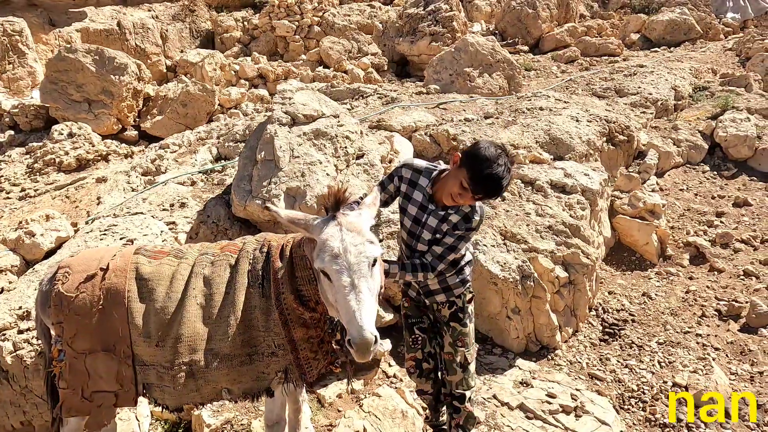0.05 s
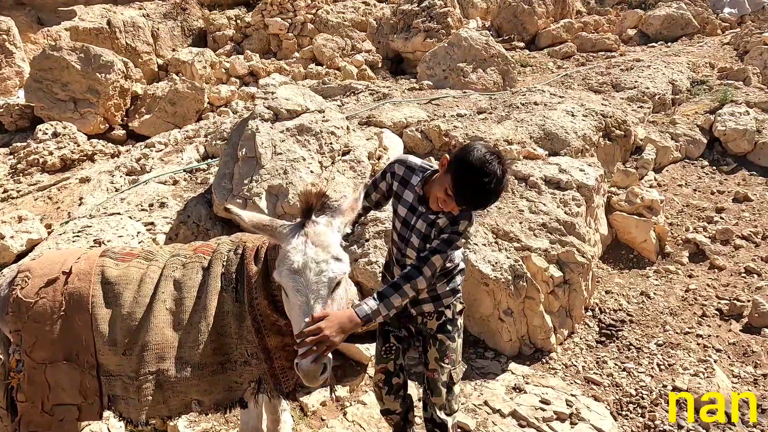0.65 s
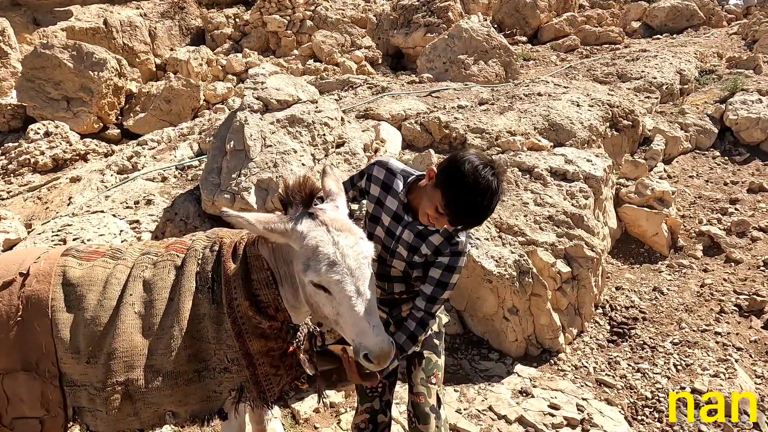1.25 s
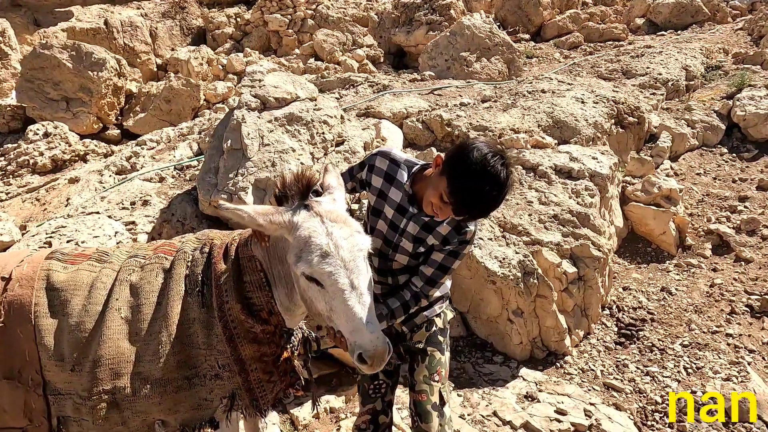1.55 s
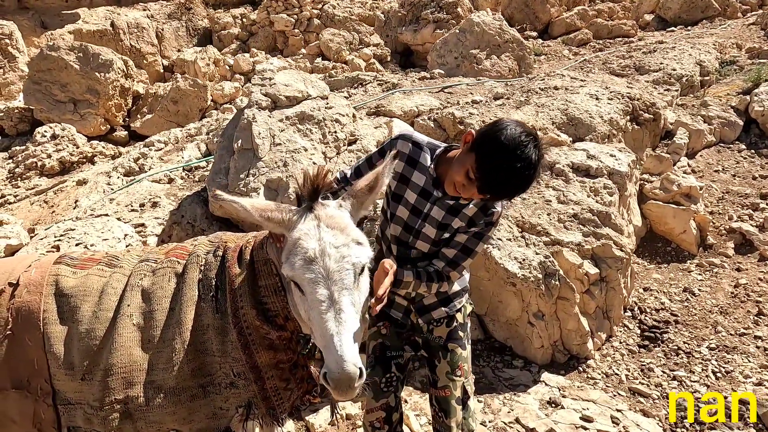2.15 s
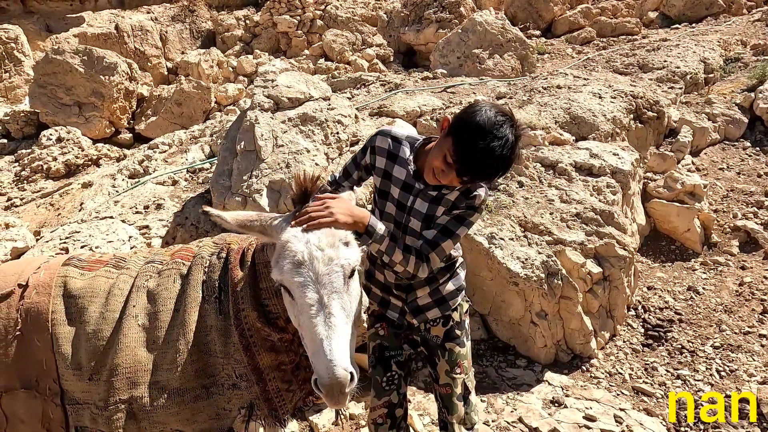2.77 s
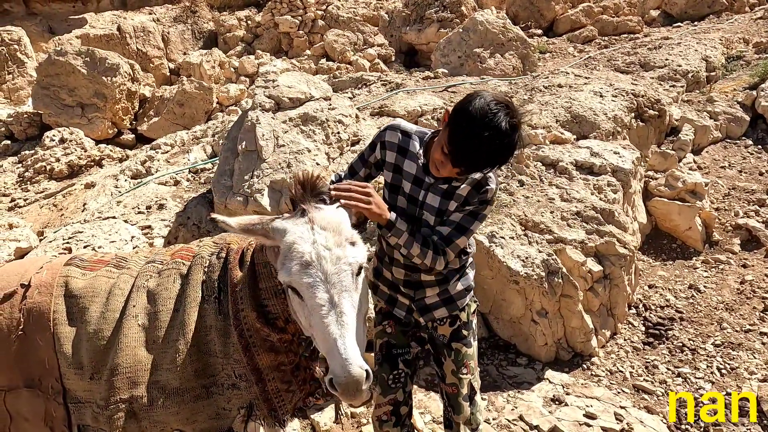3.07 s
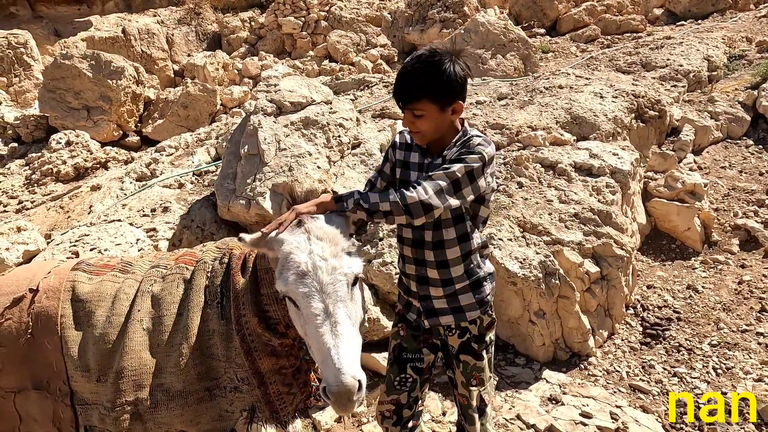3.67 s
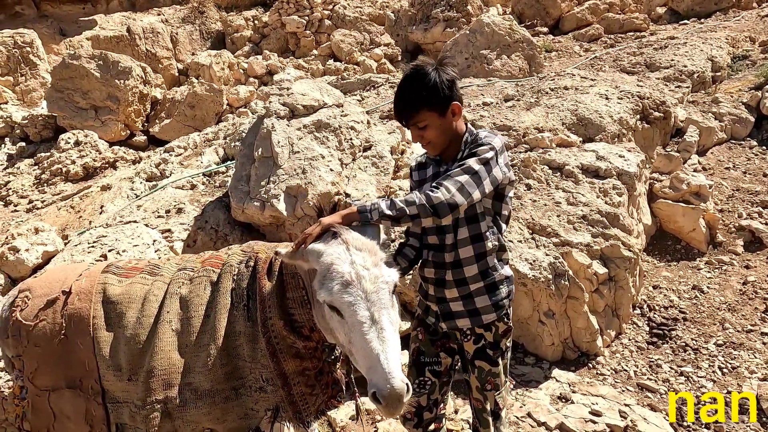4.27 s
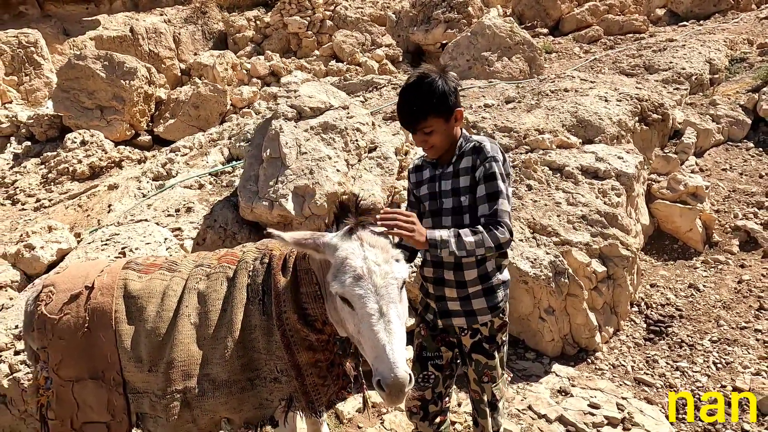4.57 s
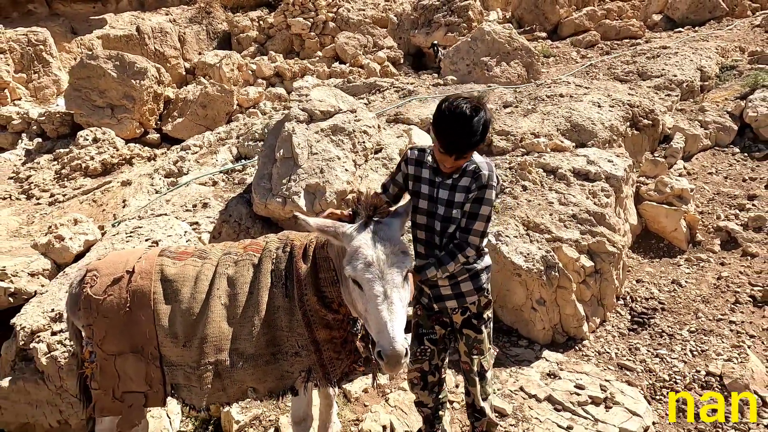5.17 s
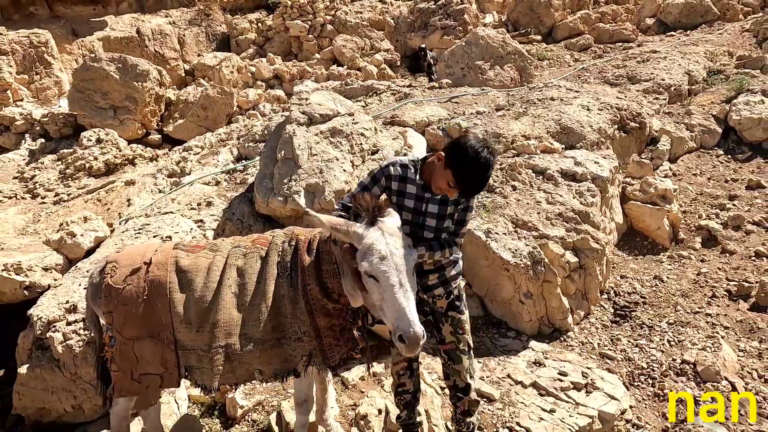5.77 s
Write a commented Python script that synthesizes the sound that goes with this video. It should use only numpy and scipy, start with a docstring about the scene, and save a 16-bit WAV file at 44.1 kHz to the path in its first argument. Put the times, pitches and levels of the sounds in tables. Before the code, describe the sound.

Several wavering goat bleats and a kid's bright cry sound over gusty low wind rumble and soft nearby scuffs and rustles.

```python
"""Goats and a donkey on a rocky slope

Goats bleat across dry ground, most voices throbbing about eleven times a second: long calls
from further off, then a low hoarse one and a kid's bright cry. Close to the microphone a donkey
is being stroked: hands brush its coat, feet scuff loose soil and stones knock, one sharply.
Gusts rumble and slap on the microphone ports over a faint outdoor hiss."""
import sys
import numpy as np
from scipy import signal
from scipy.fft import rfft, irfft, next_fast_len
from scipy.io import wavfile
from scipy.ndimage import uniform_filter1d

SR = 44100
rng = np.random.default_rng(int(sys.argv[2]) if len(sys.argv) > 2 else 0)


def waveform_to_disk(signal):
    """Save audio, clipped to [-1, 1], as 16-bit WAV at the path in sys.argv[1]."""
    frames = np.transpose(np.atleast_2d(signal))
    scaled = np.clip(frames, -1, 1) * 32767
    samples = np.round(scaled).astype(np.int16)
    wavfile.write(sys.argv[1], SR, samples)


N = 265526
T = np.arange(N) / SR
TOP_HZ = 15650  # the recorder's upper limit


def undb(db):
    """Decibels to gain."""
    return 10 ** (np.asarray(db) / 20)


def unit(x):
    """Scale to rms 1."""
    return x / np.sqrt(np.mean(x ** 2) + 1e-20)


def gain_at(hz, spectrum):
    """Gain of a spectrum (f/Hz, level/dB) at these frequencies."""
    f, db = np.transpose(spectrum)
    return undb(np.interp(np.log(hz + 1e-3), np.log(f), db))


def colour(x, spectrum):
    """Filter by a spectrum, causally, so that attacks stay sharp."""
    n = next_fast_len(2 * len(x)) * 2
    cepstrum = irfft(np.log(gain_at(np.arange(n // 2 + 1) * SR / n, spectrum)))
    cepstrum[1:n // 2] *= 2
    cepstrum[n // 2 + 1:] = 0
    return irfft(rfft(x, n) * np.exp(rfft(cepstrum)))[:len(x)]


def focus(spectrum, hz, fall_db):
    """Weight a spectrum around hz, fall_db down an octave away: small contacts sound high."""
    return [(f, db - fall_db * np.log2(f / hz) ** 2) for f, db in spectrum]


def noise():
    """White noise."""
    return rng.standard_normal(N)


def walk(rate):
    """Smooth random drift that changes `rate` times a second; rms 1."""
    k = max(int(SR / rate), 1)
    return unit(uniform_filter1d(uniform_filter1d(noise(), k), k))


def wobble(t, rate):
    """Random values, `rate` a second, joined by straight lines."""
    knots = np.arange(t[0], t[-1] + 1 / rate, 1 / rate)
    return np.interp(t, knots, rng.standard_normal(len(knots)))


def curves(table, fade_s=.0033):
    """A gate over the table's span, then its columns at every sample."""
    s, *columns = np.transpose(table)
    gate = np.clip(np.minimum(T - s[0], s[-1] - T) / fade_s, 0, 1)
    return [gate] + [np.interp(T, s, column) for column in columns]


# Width at the microphone: f/Hz, side level/dB
SIDE_SPECTRUM = [(30, -13.5), (140, -15.5), (500, -14), (1500, -12), (4000, -10), (6500, -11.5),
                 (8500, -3.5), (14000, -3)]


def stereo(x, left_db=0, other=None):
    """Two microphone ports: alike in the bass, while scattered sound sets them apart in the treble."""
    if other is None:
        t = T[:SR // 10]
        scatter = rng.standard_normal(len(t)) * np.exp(-t / .013)
        other = signal.fftconvolve(x, scatter / np.linalg.norm(scatter))[:N]
    side = colour(other, SIDE_SPECTRUM)
    return np.array([(x + side) * undb(left_db / 2), (x - side) * undb(-left_db / 2)])


def quaver(crest_s, rate_hz, depth_db, sag, skew=.55):
    """Each pulse of breath swells the voice as its pitch slides down. Gives dB and a pitch factor."""
    turn = 2 * np.pi * rate_hz * (T - crest_s)
    slide = np.sin(turn) - skew * np.sin(2 * turn) / 2
    return depth_db / 2 * (np.cos(turn) - .5), 1 - sag * depth_db * slide


def bleat(table, nose, throat, jitter, hiss_db, crest_s=0, throb_hz=0, sag=0,
          flutter_db=4.5, fray=.5, tongue=0, jaw_db=0, grit=.0282, buzz=0):
    """Vocal folds sound through the nose, then the open mouth; tongue and jaw move the resonances."""
    gate, hz, level_db, mouth, rasp, depth_db = curves(table)
    throb_db, bend = quaver(crest_s, throb_hz, depth_db, sag)
    # the folds wander; in a rasp no cycle is as long as the last
    hz = hz * bend * (1 + jitter * walk(90) + grit * (.1 + rasp) * walk(600))
    phase = 2 * np.pi * np.cumsum(hz) / SR
    on = gate > 0
    stretch = 1 + tongue * walk(25)[on]
    # the lowest resonance climbs as the jaw drops
    jaw_hz, jaw_width_hz = np.interp(mouth[on], [0, 1], [287, 1190]), 210
    voice, power = np.zeros(N), np.full(N, 1e-12)
    for k in range(1, 40):
        partial_hz = k * hz[on]
        size = gain_at(partial_hz, nose) ** (1 - mouth[on])
        size *= gain_at(partial_hz * stretch, throat) ** mouth[on]
        size *= undb(jaw_db / (1 + ((partial_hz - jaw_hz) / jaw_width_hz) ** 2))
        size *= undb(flutter_db * wobble(T[on], 60)) * (partial_hz < TOP_HZ)
        # each harmonic frays quickly, the more so in a rasp
        frayed = 1 + fray * np.sqrt(rasp[on]) * (wobble(T[on], 220) + 1j * wobble(T[on], 220))
        harmonic = np.exp(1j * (k * phase[on] + rng.uniform(0, 2 * np.pi)))
        voice[on] += size * np.real(frayed * harmonic)
        power[on] += size ** 2 / 2
    # strained folds swing wider on every third cycle
    voice *= 1 + buzz * np.sqrt(rasp) * np.cos(phase / 3 + walk(60))
    # air escapes from the open mouth once a cycle
    puffs = unit(colour(noise() * (1 + np.cos(phase)), throat))
    hiss = undb(hiss_db) * mouth ** 2 * (1 + 2 * rasp) * puffs
    shimmer_db = 1.5 * walk(120)
    return (voice / np.sqrt(power) + hiss) * gate * undb(level_db + throb_db + shimmer_db)


# Calls from further off: t/s, f/Hz, level/dB, mouth opening/0-1, rasp/0-1, quaver depth/dB
DYING_CALL = [(0, 409.5, -57.5, 0.25, 0.95, 8.5), (.1, 385.5, -65.5, 0.56, 0.68, 13.6),
              (.17, 370, -66, 0.69, 1, 4.8)]
THIN_CALL = [(.165, 413, -74, 0.88, 0.42, 2), (.2, 422.4, -64.5, 0.83, 0.69, 2.8),
             (.27, 436, -64, 1, 0.39, 3), (.35, 428, -63, 1, 0.58, 3), (.39, 443, -74, 1, 0.99, 2),
             (.46, 449, -71, 1, 0.56, 1.55)]
FIRST_LONG_CALL = [(.445, 442, -71, 0.9, 0.35, 4), (.48, 436.8, -56.5, 1, 0.38, 9.5),
                   (.68, 420.8, -54.5, 1, .2, 7.5), (.86, 403, -57.5, 0.76, .12, 9),
                   (.96, 396.4, -61, 0.68, 0.3, 8.5), (1.05, 377.6, -63, 0.6, 0.04, 9),
                   (1.078, 369, -66, 0.1, 0.2, 8.5), (1.095, 350, -72, .3, .2, 6)]
SECOND_LONG_CALL = [(2.405, 429, -74, 1, 0.54, 11), (2.45, 422.4, -66.5, 1, 0.47, 10.3),
                    (2.535, 418.5, -66.5, 0.96, 0.29, 11.7), (2.62, 417.5, -64.5, 0.88, 0.31, 9.8),
                    (2.705, 428, -62.5, 0.95, 0.35, 10), (2.79, 401.6, -67, 0.77, 0.32, 10),
                    (2.885, 398, -65.5, 0.56, 0.45, 9.5), (2.98, 394, -68.5, 0.44, 0.23, 8),
                    (3.03, 375.5, -76, .15, 0.29, 11)]
# Nose (lips shut) and throats (mouth open) at that distance: f/Hz, level/dB
FAR_NOSE = [(400, -9), (820, -4), (1200, 6.5), (1700, -17.5), (2200, -27.5), (2800, -9.5), (4000, -38.5),
            (6000, -34), (9000, -47)]
DYING_AND_FIRST_THROAT = [(420, -16.5), (830, -4.5), (1250, 2), (1680, -13.5), (2100, -5.5), (2500, -8),
                          (2900, -8), (3350, -16.5), (3800, -5), (4200, -9.5), (4700, -9.5), (5400, -18),
                          (6700, -22), (8000, -44), (11000, -72)]
THIN_THROAT = [(430, -11), (860, 0), (1300, -5.5), (1740, -2), (2170, -10.5), (2600, -7), (3050, -9.5),
               (3900, -17), (5000, -21.5), (6700, -24), (9000, -52)]
SECOND_THROAT = [(420, -16), (830, -12), (1250, 1), (1680, -13), (2100, -10), (2350, -12), (2560, -4.5),
                 (2900, 3.5), (3300, -12), (3780, -1), (4200, -9), (5000, -5.5), (5500, -15), (7000, -26),
                 (9000, -58)]


def distant_goats():
    """Further off on the slope: a bleat's last throbs, a thin call, then two long quavering ones."""
    dying = bleat(DYING_CALL, FAR_NOSE, DYING_AND_FIRST_THROAT, jitter=.008, hiss_db=-12,
                  crest_s=.005, throb_hz=10.7, sag=.0018)
    thin = bleat(THIN_CALL, FAR_NOSE, THIN_THROAT, jitter=.005, hiss_db=-16,
                 crest_s=.772, throb_hz=10.95, sag=.002, flutter_db=4, fray=.45, grit=.02)
    first = bleat(FIRST_LONG_CALL, FAR_NOSE, DYING_AND_FIRST_THROAT, jitter=.0045, hiss_db=-16,
                  crest_s=.772, throb_hz=10.95, sag=.0027, tongue=.03, grit=.028, buzz=.3)
    second = bleat(SECOND_LONG_CALL, FAR_NOSE, SECOND_THROAT, jitter=.005, hiss_db=-12,
                   crest_s=2.713, throb_hz=11.2, sag=.0023, fray=.55, tongue=.02, grit=.022, buzz=.4)
    return dying + thin + first + second


def boulder_echo(x, t60_s, wet_db, dull_hz=3500):
    """Boulders on the slope scatter a thin, dull echo back to the microphone."""
    t = T[:SR // 2]
    tail = rng.standard_normal(len(t)) * undb(-60 * t / t60_s) * np.clip(t / .028, 0, 1)
    lowpass = signal.butter(2, dull_hz, fs=SR, output="sos").repeat(2, axis=0)
    tail = signal.sosfilt(lowpass, tail)
    echo = signal.fftconvolve(x.mean(axis=0), tail / np.linalg.norm(tail))[:N]
    return stereo(echo) * undb(wet_db)


def eddies(spectrum, steady_s):
    """Turbulent pressure whose strength holds even over stretches longer than steady_s."""
    x = colour(noise(), spectrum)
    return x / np.sqrt(uniform_filter1d(x ** 2, int(steady_s * SR)) + 1e-12)


# Gusts on the microphone: t/s, rumble level/dB, buffet level/dB
GUSTS = [(0.0, -33, -56), (0.42, -52, -69.5), (0.54, -31.5, -53.5), (0.66, -45, -54), (0.96, -41.5, -66),
         (1.26, -41.5, -57), (1.32, -55.5, -74), (1.5, -44, -68), (1.56, -52, -53), (1.62, -49, -76),
         (1.74, -50.5, -57), (1.8, -52, -75), (1.98, -40.5, -55), (2.04, -34, -69), (2.1, -35.5, -50),
         (2.34, -38.5, -58.5), (2.46, -40.5, -61), (2.82, -56, -78), (2.88, -45, -73), (2.94, -58, -77),
         (3.24, -35.5, -58), (3.36, -51.5, -65), (3.54, -38, -51.5), (3.84, -51.5, -74), (4.02, -51.5, -78),
         (4.14, -61, -86), (4.32, -52, -65), (4.6, -50.5, -67.5), (4.7, -46, -60.5), (4.9, -46.5, -64.5),
         (5.15, -51.5, -72.5), (5.3, -51, -66.5), (5.76, -55, -80.5), (5.82, -34.5, -55), (5.88, -53, -77),
         (6.05, -28.5, -48)]
# Large and small eddies: f/Hz, level/dB
RUMBLE = [(12, -2), (25, 6), (42, -2), (65, -13), (100, -35), (200, -76), (2000, -120)]
BUFFET = [(45, -7.5), (75, 6), (125, -2), (180, -8.5), (270, -21), (450, -35.5), (3000, -110)]


def wind(rumble_db=1, buffet_db=2, swirl_db=2, burst_db=3):
    """Right on the microphone: large eddies rumble and swirl, smaller ones buffet it in bursts."""
    gate, large_db, small_db = curves(GUSTS)
    rumble = undb(large_db + rumble_db + swirl_db * walk(18))
    buffet = undb(small_db + buffet_db + burst_db * walk(22))
    shared, apart = (eddies(RUMBLE, .05) * rumble + eddies(BUFFET, .11) * buffet for _ in range(2))
    return gate * stereo(shared, left_db=-1.5, other=apart)


# Hiss all around: f/Hz, level/dB
AIR_SPECTRUM = [(100, -4.5), (230, -0.5), (400, -6.5), (750, -16), (1400, -11), (2300, -21), (4000, -24.5),
                (5500, -22), (7100, -23), (8300, -35), (11000, -38.5), (15500, -48.5)]
# Its rise and fall: t/s, level/dB
AIR_SWELL = [(0, 2.5), (1.05, 3), (1.3, -1.5), (1.4, -1), (1.72, -1), (1.88, 1.5), (2.22, -2.5), (2.6, 0),
             (3.18, 2), (3.26, -5), (3.38, -3.5), (3.5, 1), (3.82, -1.5), (4.1, 1.5), (4.9, -2), (5.3, -1),
             (5.66, -0.5), (6, 4)]


def hillside_air(level_db=-71.5):
    """Faint hiss of the open hillside, slowly rising and falling, with a slight flicker."""
    shared, apart = (unit(colour(noise(), AIR_SPECTRUM)) for _ in range(2))
    flicker_db = 1.4 * walk(35)
    return stereo(shared, other=apart) * undb(level_db + curves(AIR_SWELL)[1] + flicker_db)


# Mostly rubs close by; at 3.832 and 3.874 s a faint, dull echo of the hoarse call, at 5.295 s a faint
# high hiss swelling: peak t/s, half-length/s, level/dB, focus f/Hz, fall an octave away/dB
SOFT_SWELLS = [(.005, 0.038, -49, 704, 1.5), (0.087, 0.13, -63.5, 1510, 6.5), (1.1, .07, -62, 380, 2.2),
               (1.243, 0.054, -64.5, 614, 1.5), (1.38, .03, -70, 1100, 1.6), (1.566, 0.065, -56.5, 2280, 5),
               (1.619, 0.072, -67.5, 2020, 3.5), (1.865, 0.26, -70, 1000, 1.4),
               (2.131, 0.092, -71.5, 2000, 4), (2.304, 0.059, -62, 900, 3), (2.375, 0.072, -65.5, 1860, 2),
               (3.073, 0.18, -74.5, 1510, 5.5), (3.832, .08, -71, 1150, 29), (3.874, 0.058, -76, 1210, 3),
               (3.994, 0.064, -71, 820, 24), (4.064, 0.034, -77, 7000, 5), (4.264, 0.067, -60.5, 300, 1),
               (4.395, 0.038, -64.5, 250, 1), (5.266, 0.11, -72.5, 2080, 12),
               (5.295, 0.92, -83.5, 13960, 1.5), (5.5, 0.073, -67, 850, 5), (5.734, .09, -74.5, 5000, 4),
               (5.788, 0.054, -67, 1980, 2.9), (5.832, 0.14, -69, 7000, 1.6), (5.86, 0.12, -72, 1320, 0),
               (5.811, 0.022, -59.5, 450, 1.5), (5.945, 0.049, -66.5, 8000, 1.2),
               (6.004, 0.061, -66.5, 2500, 1.1), (5.996, 0.025, -60, 400, 3.5)]
# Their shared colour, that of a brushed coat: f/Hz, level/dB
RUSTLE = [(150, 11.5), (500, 8.5), (950, -3), (1600, -5.5), (2600, -5.5), (4500, -9.5), (7000, -4.5),
          (8300, -13.5), (12000, -21), (15500, -32.5)]


def rubs_and_swells(grain_db=2):
    """Grainy swells: hair, cloth and soles slip in tiny catches; also a dull echo and a high hiss."""
    out = np.zeros((2, N))
    grains = rng.standard_normal((2, N)) * undb(grain_db * walk(230))
    for s, half_s, level_db, hz, fall_db in SOFT_SWELLS:
        on = np.abs(T - s) < half_s
        swell = np.cos(np.pi / 2 * (T[on] - s) / half_s) ** 4 * undb(level_db)
        for layer, grain in zip(out, grains):
            layer[on] += swell * unit(colour(grain[on], focus(RUSTLE, hz, fall_db)))
    return stereo(out[0], other=out[1])


# Single eddies on the microphone: t/s, width/s, peak level/dB
WIND_SLAPS = [(.498, 0.0047, -32.5), (.64, 0.0062, -37), (1.732, 0.0038, -40.5), (2.187, 0.003, -27),
              (3.223, 0.0079, -33.5), (3.436, 0.0091, -31), (3.487, 0.003, -29), (3.54, .005, -32.5),
              (5.824, 0.0062, -34.5), (6.001, 0.0057, -28)]


def wind_slaps():
    """A small eddy hits the ports: one push of pressure with a shallow suction before and after."""
    out = np.zeros(N)
    for s, width_s, peak_db in WIND_SLAPS:
        u = (T - s) / width_s
        out += undb(peak_db) * (1 - u ** 2) * np.exp(-u ** 2 / 2)
    return stereo(out)


def contacts(table, body, crunch, gain_db):
    """An impact, then a crunch of grit, coloured by what is hit; more crunch softens the onset."""
    out, t = np.zeros(N + SR), T[:SR // 5]
    for s, peak_db, decay_s, hz, fall_db in table:
        push = crunch * rng.standard_normal(len(t)) * undb(-60 * t / decay_s)
        push[0] += 1
        hit = colour(push, focus(body, hz, fall_db))
        start = int(s * SR)
        out[start:start + len(t)] += hit / np.abs(hit).max() * undb(peak_db + gain_db)
    return stereo(out[:N])


# Stones close by: t/s, relative peak level/dB, decay/s, focus f/Hz, fall an octave away/dB
STONE_KNOCKS = [(.678, -29, 0.038, 1500, 0.5), (0.6815, -15, 0.028, 1150, 0.5), (.6825, -28, .025, 210, 4),
                (.689, -33, 0.062, 650, 1.5), (.713, -33.5, 0.037, 5000, 5.5),
                (1.002, -39.5, 0.03, 7000, 4), (1.003, -47, 0.051, 1120, 39), (1.787, -61, 0.23, 1460, 9.5),
                (4.0245, -53, 0.042, 4040, 0), (4.742, -53, .015, 9000, 2)]
# Ring of a struck stone: f/Hz, level/dB
STONE_RING = [(100, -8), (200, 3), (290, 4), (400, 0), (500, 0), (720, -1), (930, -17), (1250, -4),
              (1600, 1), (2100, 2), (2500, -11), (3500, -13), (4600, -15), (6500, -19), (8400, -43),
              (14000, -50)]


def stone_knocks():
    """Stones knock near the microphone: hard contacts with little grit."""
    return contacts(STONE_KNOCKS, STONE_RING, crunch=.071, gain_db=1.5)


# Feet close by: t/s, relative peak level/dB, decay/s, focus f/Hz, fall an octave away/dB
FOOT_SCUFFS = [(1.2, -43, .09, 380, 3.5), (1.36, -61.5, 0.087, 900, 1.3), (1.484, -58.5, 0.11, 500, 4.3),
               (2.286, -55, .1, 900, 2.3), (2.698, -49, 0.083, 1770, 10), (2.978, -50, 0.082, 1060, 26),
               (3.143, -60.5, 0.082, 5500, 6.4), (3.172, -54.5, 0.086, 1900, 1.6),
               (3.221, -55, 0.067, 1100, 1.6), (3.314, -61, 0.05, 880, 21),
               (4.0315, -49.5, 0.057, 1186, 2.7), (4.257, -52, 0.063, 900, 1.2),
               (5.077, -53.5, 0.084, 760, 7.3), (5.079, -56, 0.069, 1970, 15),
               (5.211, -63.5, 0.053, 2000, 3), (5.604, -62, 0.026, 5540, 16),
               (5.616, -57.5, 0.036, 3300, 17), (5.775, -47, 0.055, 2700, 3.5),
               (5.793, -55, .02, 7000, 1.5), (5.824, -49, 0.042, 4000, 1.3), (5.842, -55, 0.044, 4500, 1)]
# Loose dry ground, with no ring of its own: f/Hz, level/dB
SOIL = [(150, 8), (1000, 4), (3000, -4.5), (7000, -8), (8500, -19.5), (15000, -27)]


def foot_scuffs():
    """Feet shift near the microphone: soft contacts, mostly crunch."""
    return contacts(FOOT_SCUFFS, SOIL, crunch=.6, gain_db=-2)


# Low call: t/s, f/Hz, level/dB, mouth opening/0-1, rasp/0-1, quaver depth/dB
HOARSE_CALL = [(3.28, 230, -66, 0, .2, 0), (3.315, 244.3, -60, 0, .2, 0), (3.34, 254.8, -77, 0, 0.36, 0),
               (3.385, 306, -65, 0, .2, 0), (3.415, 336, -58.5, 0.18, 0.14, 0),
               (3.45, 334.7, -68.5, 0.34, 0.57, 0), (3.485, 365, -71, 0.49, .5, 0),
               (3.51, 355, -60.5, 0.28, 0.18, 0), (3.54, 349.8, -63.5, 0.37, 0.29, 0),
               (3.572, 339.8, -62, 0.58, 0.76, 0), (3.595, 342, -57.5, 0.66, 0.87, 0),
               (3.62, 366.7, -64, .95, .8, 0), (3.645, 353.7, -66, 0.86, .7, 0),
               (3.685, 374, -53, 0.8, 0.21, 0), (3.718, 382, -54, 1, 0.36, 0),
               (3.745, 386.5, -63, 1, 0.69, 0), (3.775, 380, -77, 1, 0.71, 0)]
# Its nose and throat: f/Hz, level/dB
HOARSE_NOSE = [(250, 12.5), (520, -4), (720, -9), (1050, -19), (1350, -26), (1650, -14), (2300, -29),
               (2900, -18), (4000, -34.5), (5500, -40), (9000, -61), (15000, -60)]
HOARSE_THROAT = [(380, -14), (760, -5), (1140, 0), (1520, -8), (1900, 0), (2300, -9), (2650, -6), (3050, 1),
                 (3250, -4), (3450, 0), (3820, 4), (4250, -5), (5000, -4), (5500, -11), (6500, -12),
                 (7600, -21), (9000, -31), (12000, -54)]


def hoarse_goat():
    """A low voice on the slope starts through the nose and opens out in broken heaves."""
    return bleat(HOARSE_CALL, HOARSE_NOSE, HOARSE_THROAT, jitter=.012, hiss_db=-15,
                 flutter_db=5, fray=.6, tongue=.03, jaw_db=7, buzz=.3)


# The kid: t/s, f/Hz, level/dB, mouth opening/0-1, rasp/0-1, quaver depth/dB
KID_CRY = [(4.03, 389, -55, .12, 0.37, 1.8), (4.075, 462.4, -63, 0.18, 0.53, 4),
           (4.11, 502.3, -75, .15, .5, 6.1), (4.15, 526.8, -58, .19, 0.14, 5.3),
           (4.252, 537, -57, 0.31, 0.16, 6.1), (4.28, 557.3, -54, 0.84, 0.063, 1.8),
           (4.315, 558, -52.5, 1, 0.091, 1.4), (4.345, 543.7, -54.5, .95, 0.16, 1.8),
           (4.425, 550.4, -53.5, 0.98, 0.14, 1.7), (4.44, 558.5, -52.5, 1, 0.04, 1.7),
           (4.51, 555.2, -52.5, 1, 0.068, 1.5), (4.537, 540.7, -54, 0.89, 0.23, 2),
           (4.578, 540, -55.5, 0.8, 0.2, 2), (4.6, 548.5, -53.5, .93, 0.23, 1.7),
           (4.655, 531.4, -53.5, .88, 0.17, 2), (4.705, 494.5, -71, 0.99, 0.56, 2.3)]
KID_CROAK = [(4.675, 510, -63, 0.7, 0.38, 0), (4.715, 481, -55.5, 0.91, 0.83, 1),
             (4.745, 470, -69.5, 1, 1, 4), (4.79, 437, -74, 0.83, 1, 0)]
# Its nose and throat: f/Hz, level/dB
KID_NOSE = [(250, 13.5), (520, -1.5), (800, -12), (1150, -35), (1650, -27), (2300, -41), (3100, -42),
            (5500, -45), (7500, -49), (9000, -48), (15000, -60)]
CRY_THROAT = [(550, -2), (1100, 0), (1650, 5), (2200, 2), (2750, -9), (3280, 5.5), (3850, -4.5),
              (4400, -2.5), (4980, 3), (5500, 4.5), (6080, -3), (6600, -3.5), (7180, -4.5), (7750, -16),
              (8300, -23.5), (10000, -31), (15000, -53)]
CROAK_THROAT = [(470, -6.5), (940, -13), (1410, 8.5), (1900, -10), (2600, -23), (3300, -10), (6000, -14),
                (7500, -20), (9000, -28), (14000, -42)]


def goat_kid(crest_s=4.32, throb_hz=11.45):
    """A kid's clear, high cry breaks into a rasping croak."""
    cry = bleat(KID_CRY, KID_NOSE, CRY_THROAT, jitter=.0022, hiss_db=-23,
                crest_s=crest_s, throb_hz=throb_hz, sag=.0004,
                flutter_db=4.2, fray=.48, tongue=.012, grit=.018, buzz=.45)
    croak = bleat(KID_CROAK, KID_NOSE, CROAK_THROAT, jitter=.012, hiss_db=-16,
                  crest_s=crest_s, throb_hz=throb_hz, sag=.001, flutter_db=4)
    return cry + croak


def scene():
    """The slope as heard from beside the donkey, with the kid a little to the left."""
    calls = stereo(distant_goats() + hoarse_goat()) + stereo(goat_kid(), left_db=2.5)
    stones, scuffs = stone_knocks(), foot_scuffs()
    echoes = boulder_echo(calls, t60_s=.25, wet_db=-18) + boulder_echo(stones, t60_s=.32, wet_db=-31.5)
    return calls + stones + scuffs + echoes + rubs_and_swells() + wind() + wind_slaps() + hillside_air()


# The recorder's stereo width: t/s, side level/dB
WIDENING = [(0, -54.5), (1.9, -37.5), (2.3, -7), (4.3, 1.5), (6, 5)]


def record(dry):
    """The recorder opens its picture from near mono to wide and cuts the top."""
    mid = (dry[0] + dry[1]) / 2
    side = (dry[0] - dry[1]) / 2 * undb(curves(WIDENING)[1])
    top_cut = signal.ellip(8, .2, 70, TOP_HZ, fs=SR, output="sos")
    return signal.sosfilt(top_cut, np.array([mid + side, mid - side]))


dry = scene()
out = record(dry)
waveform_to_disk(out)
```